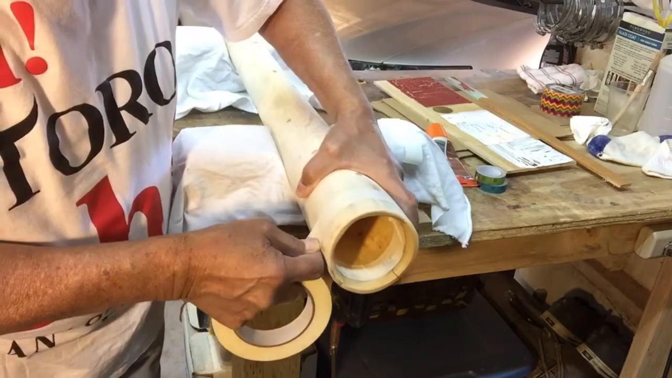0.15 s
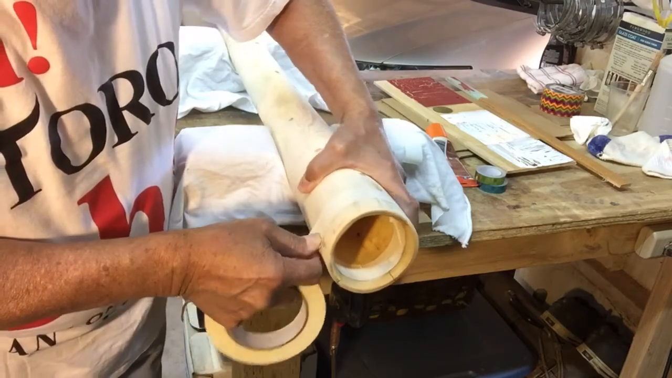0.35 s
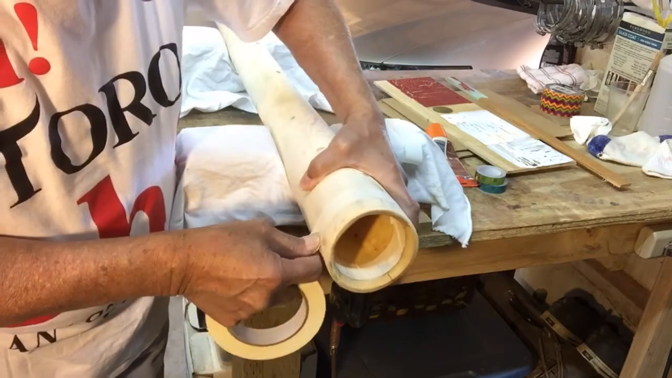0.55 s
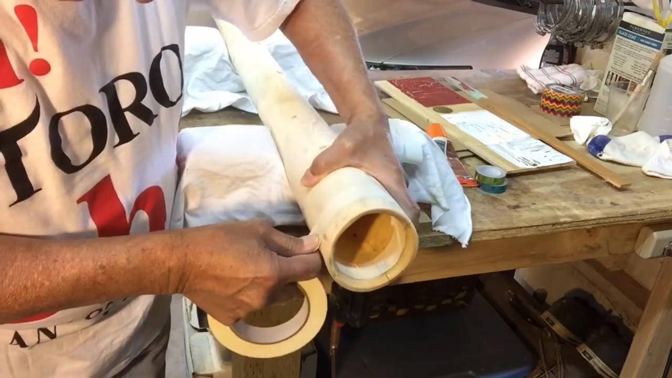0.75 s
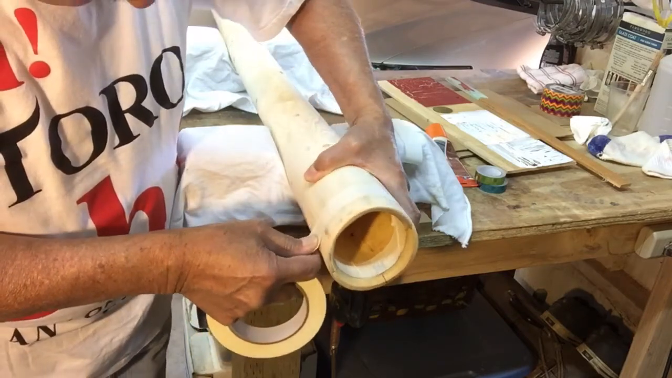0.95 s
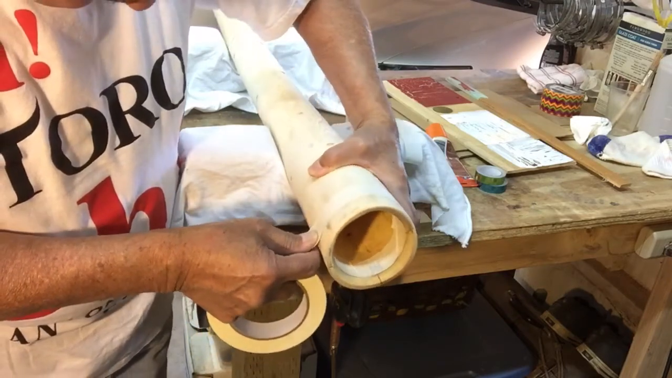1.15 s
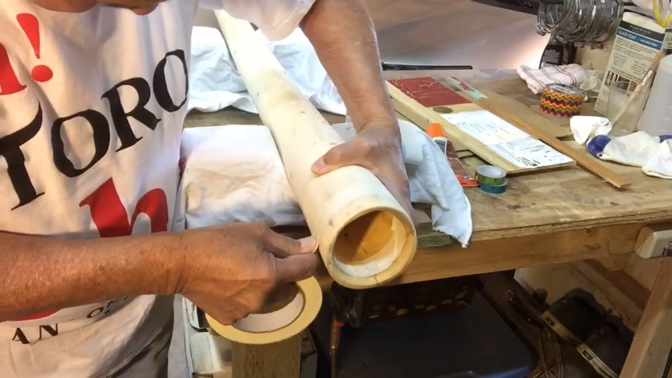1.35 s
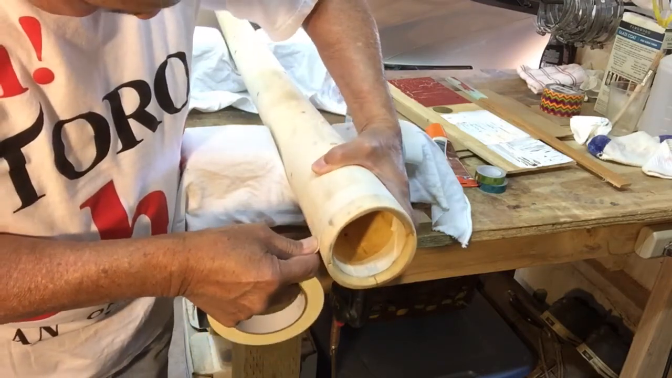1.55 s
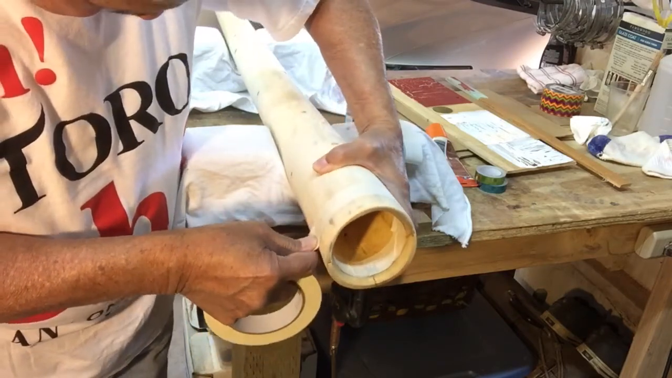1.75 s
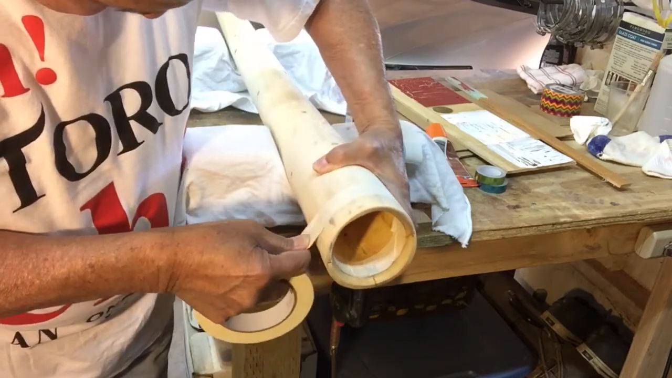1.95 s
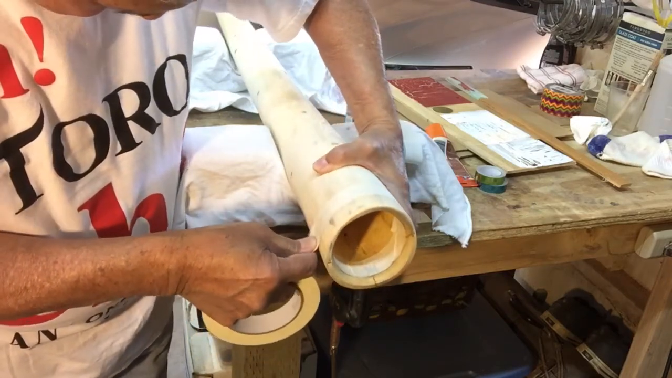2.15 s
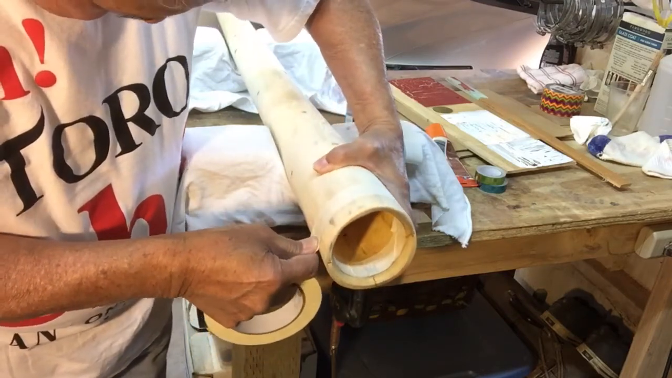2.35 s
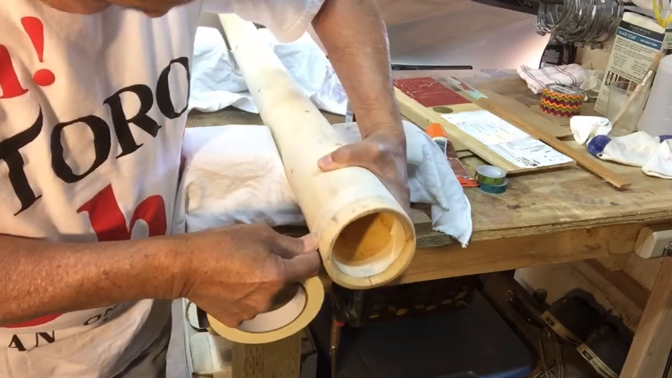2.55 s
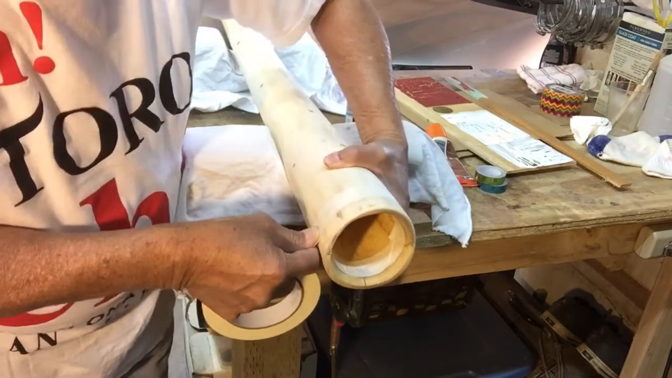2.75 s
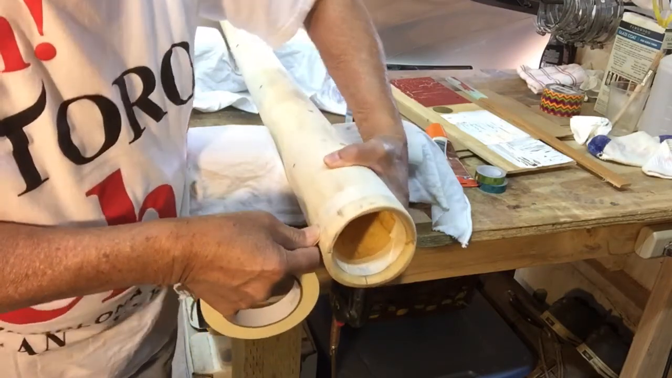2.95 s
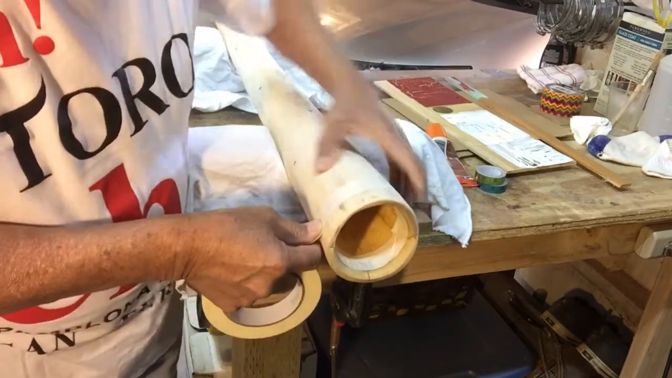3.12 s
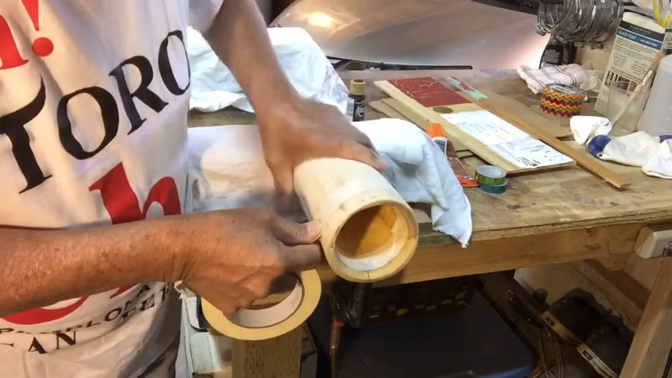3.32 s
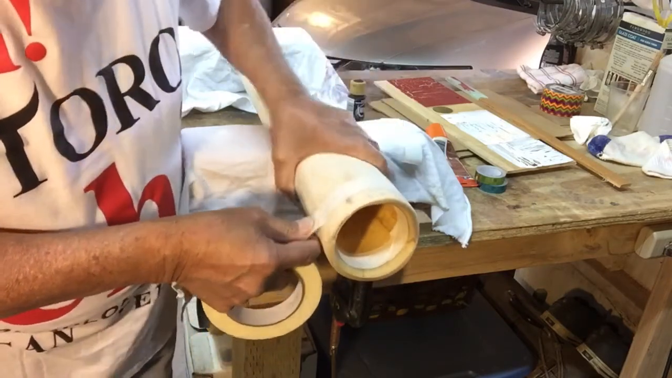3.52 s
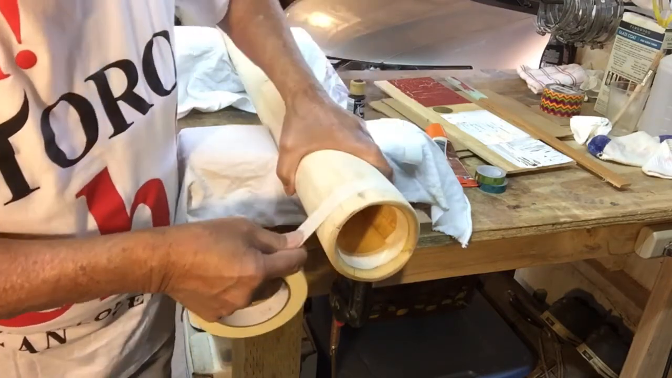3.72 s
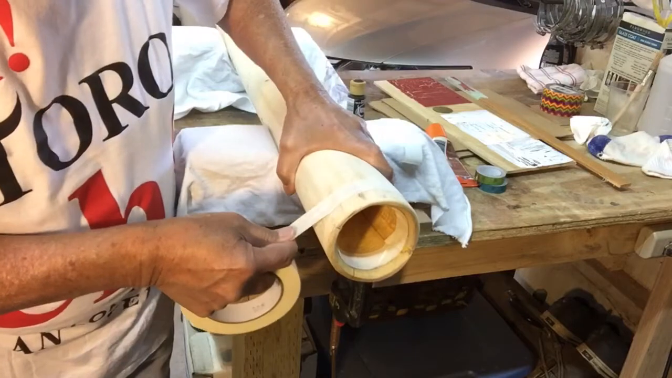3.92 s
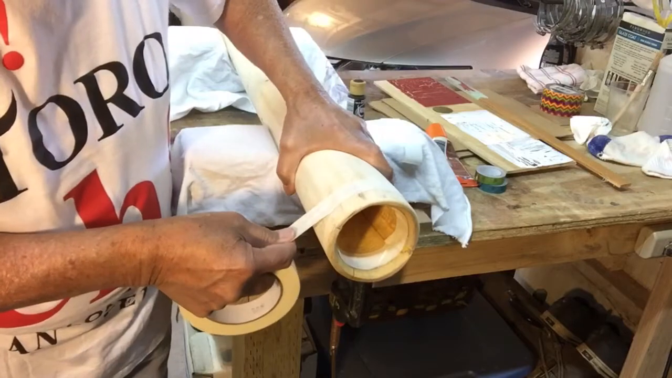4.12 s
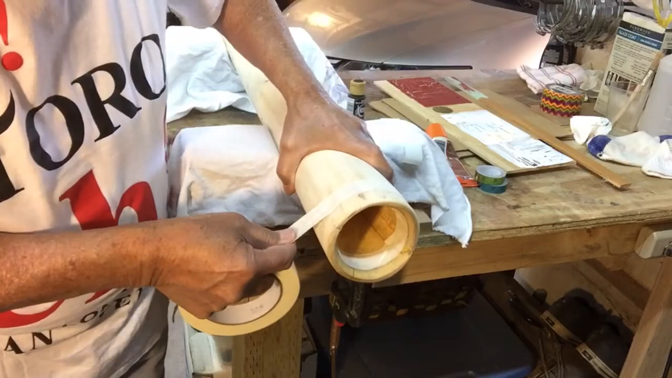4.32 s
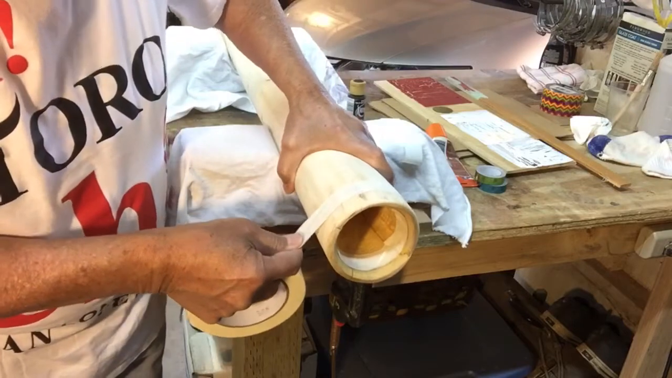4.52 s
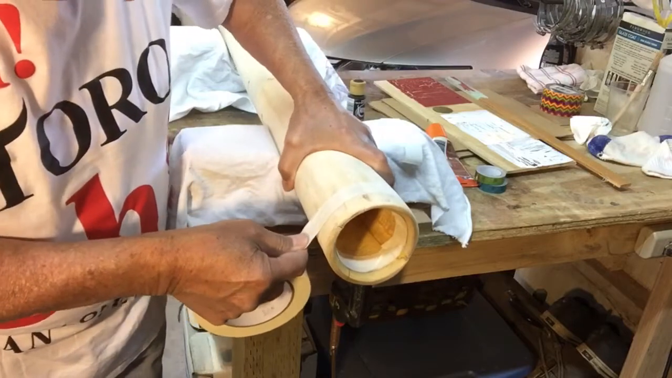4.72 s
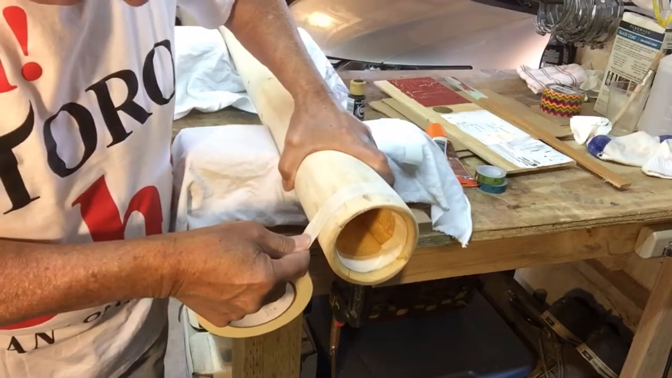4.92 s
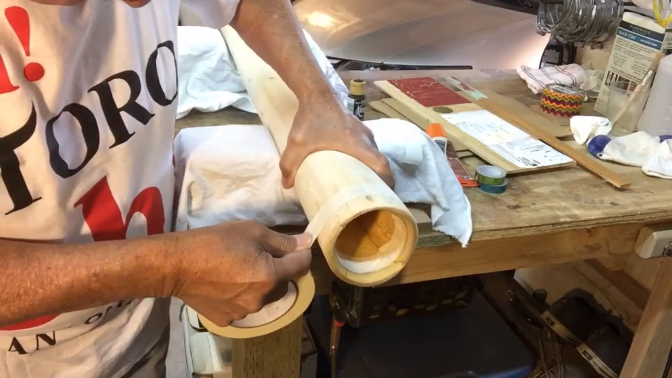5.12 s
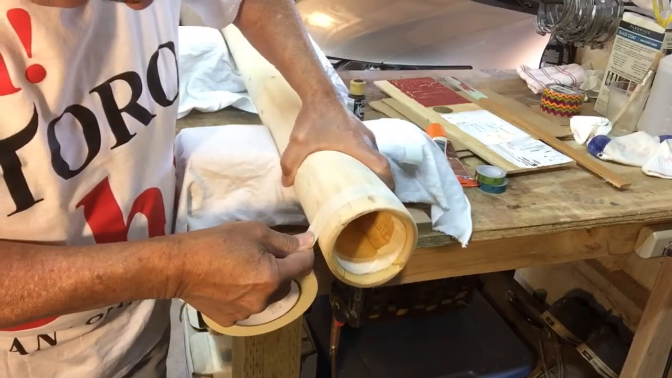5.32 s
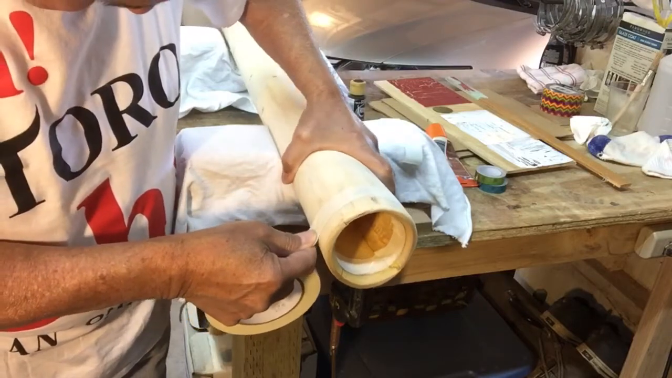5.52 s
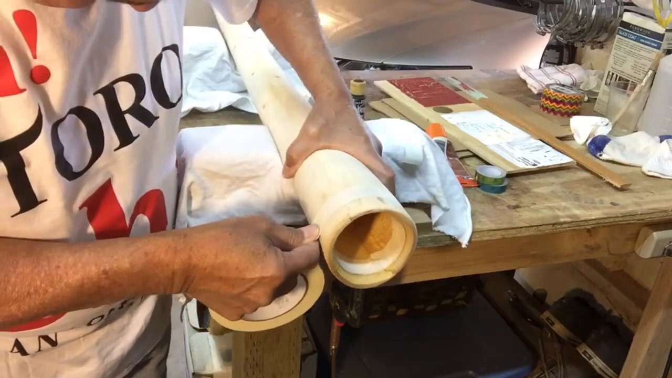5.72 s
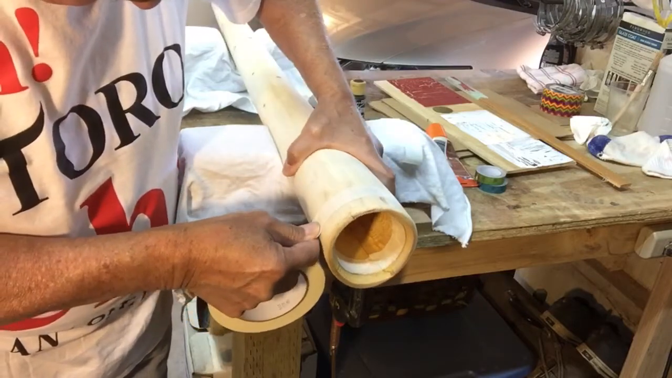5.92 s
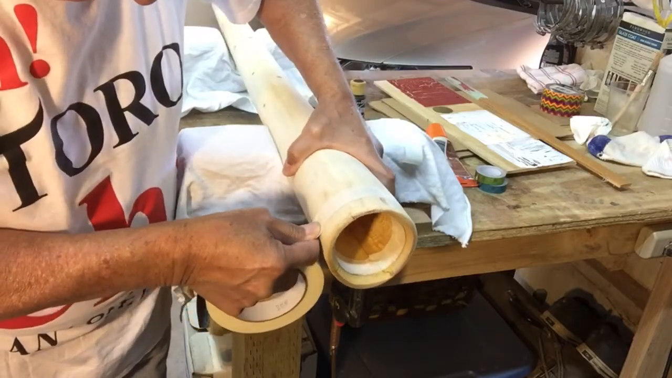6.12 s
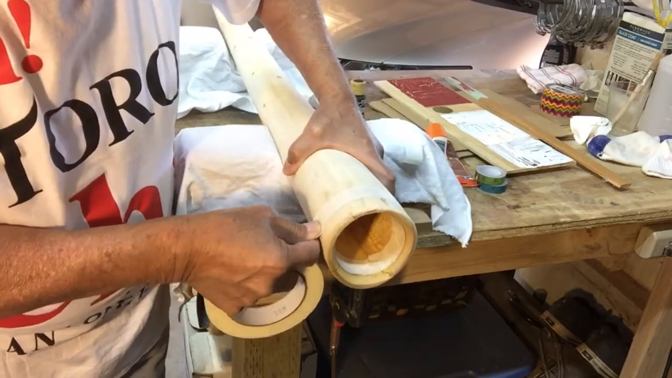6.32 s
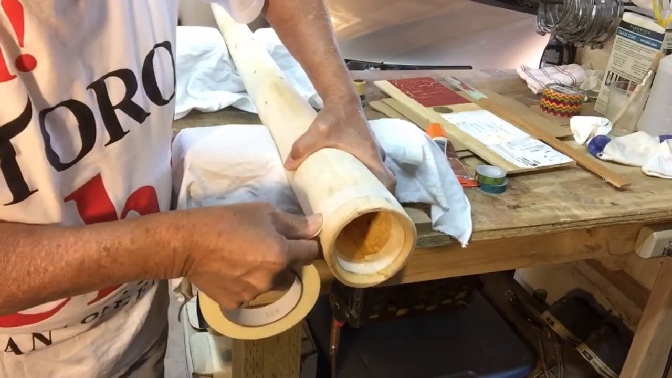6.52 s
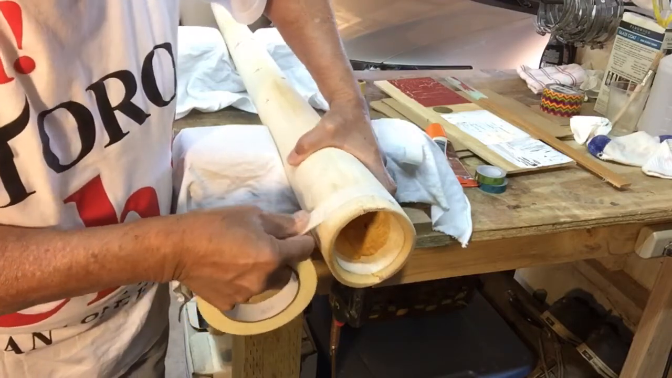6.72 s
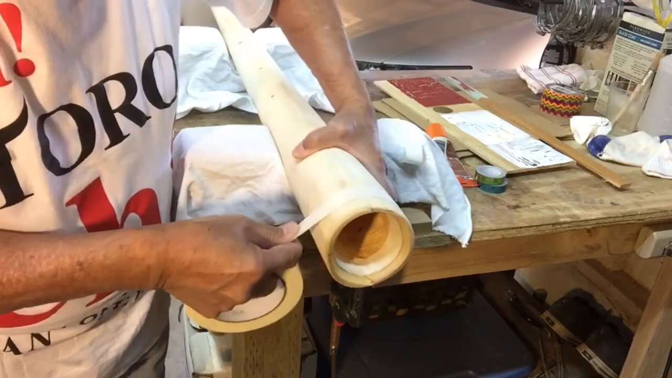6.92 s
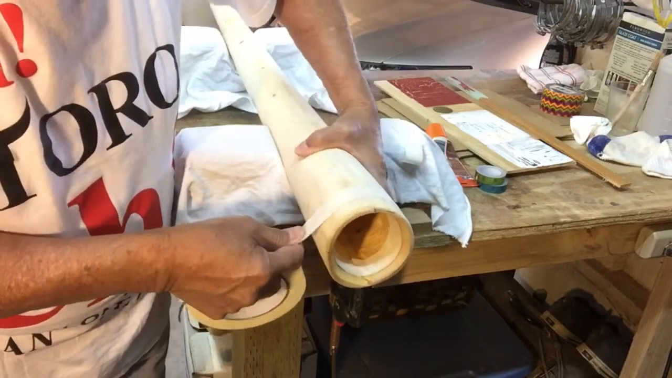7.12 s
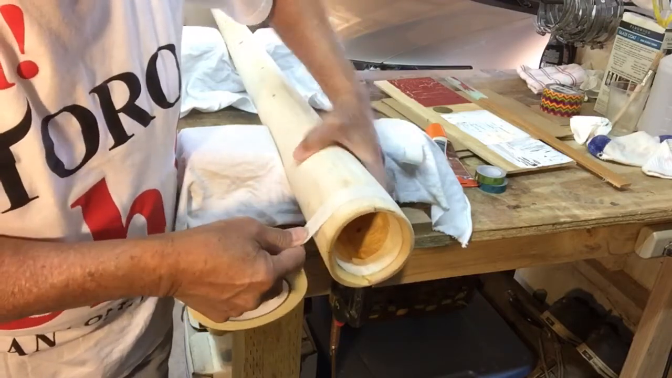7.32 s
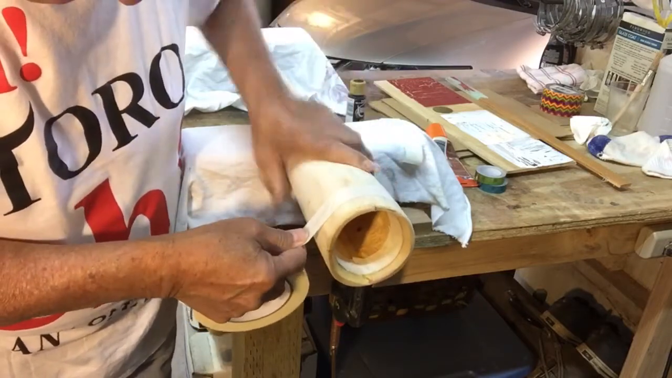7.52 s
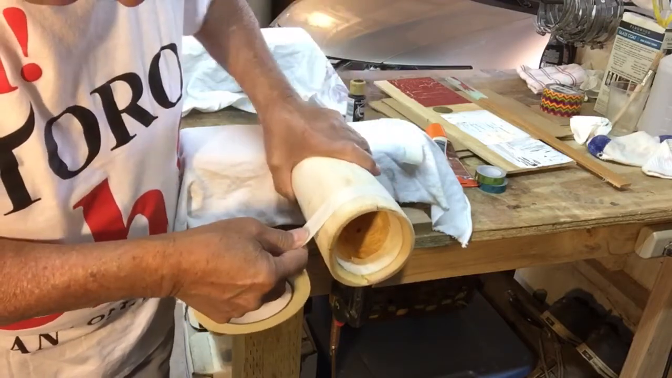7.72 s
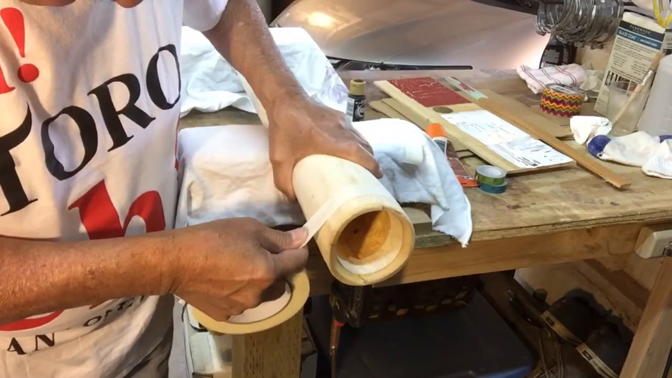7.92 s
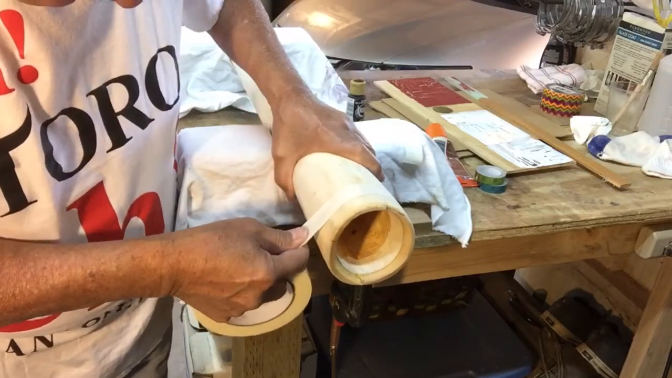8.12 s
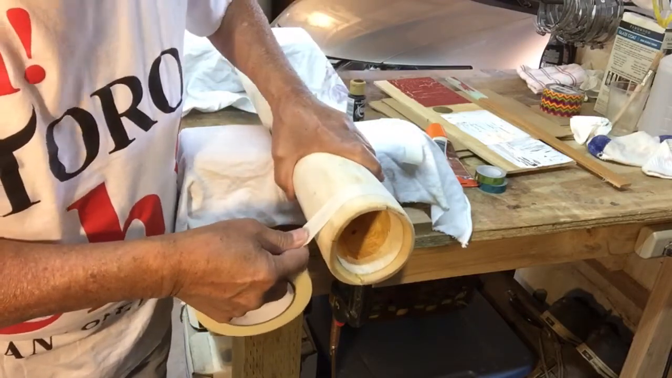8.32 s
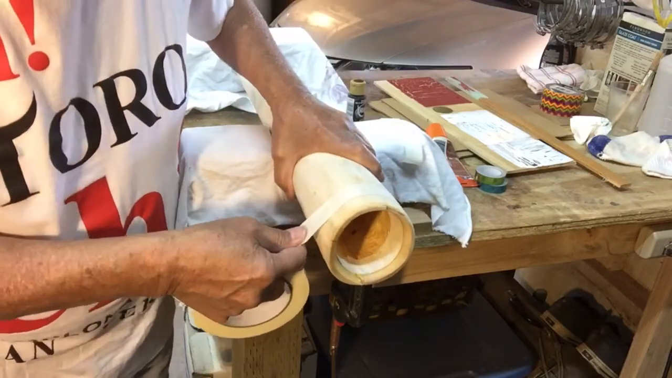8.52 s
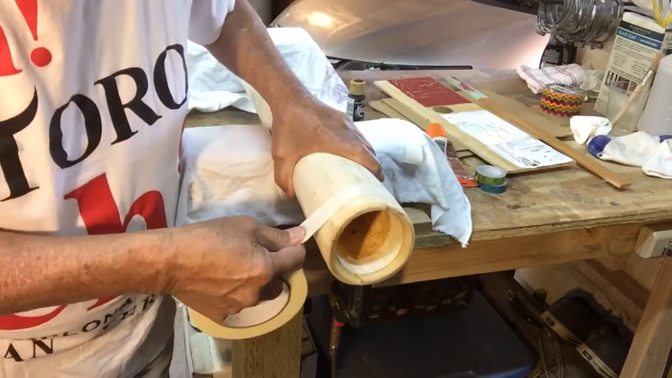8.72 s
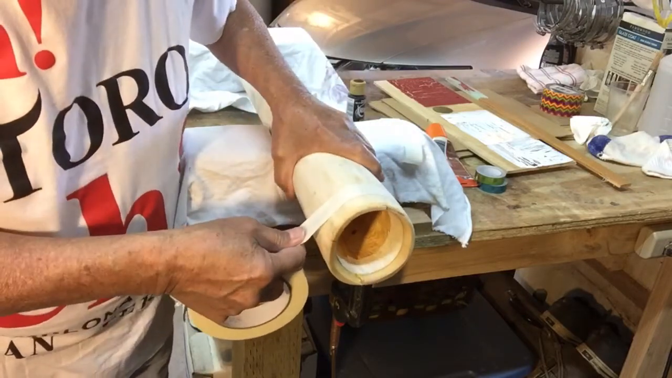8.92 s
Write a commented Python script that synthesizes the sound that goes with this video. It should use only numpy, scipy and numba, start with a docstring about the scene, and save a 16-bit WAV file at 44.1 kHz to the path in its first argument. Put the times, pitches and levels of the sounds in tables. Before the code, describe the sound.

Close, dry ripping crackles of paper tape come in uneven pulls, with soft hollow pipe thuds between them and a faint room rumble.

```python
"""In a small workshop, masking tape is wound round a plastic pipe, close to the microphone.
The glue lets go in short crackling pulls with sharp snaps: bursts of noise that ring the paper,
the free strip and, when it is taut, the roll. In and between the pulls the pipe knocks dully on
the padded bench: filtered thuds with the pipe's ring. A short echo and a quiet room noise
surround it all."""
import sys
import numpy as np
from scipy import signal
from scipy.fft import rfft, irfft, next_fast_len
from scipy.io import wavfile
from scipy.ndimage import uniform_filter1d
from numba import njit

SR = 44100
rng = np.random.default_rng(int(sys.argv[2]) if len(sys.argv) > 2 else 0)


def waveform_to_disk(signal):
    """Save audio, clipped to [-1, 1], as 16-bit WAV at the path in sys.argv[1]."""
    frames = np.transpose(np.atleast_2d(signal))
    scaled = np.clip(frames, -1, 1) * 32767
    samples = np.round(scaled).astype(np.int16)
    wavfile.write(sys.argv[1], SR, samples)


N = 399546  # length in samples


def undb(db):
    """Turn decibels into gain."""
    return 10 ** (np.asarray(db) / 20)


def along(rows, hz, axis=1):
    """Read one column of a table at any pitch, joining its points on a log-frequency axis."""
    rows = np.array(rows)
    return np.interp(np.log(hz + 1), np.log(rows[:, 0]), rows[:, axis])


def unit(x):
    """Scale a response to unit energy."""
    return x / np.sqrt(np.sum(x ** 2))


def through(x, response):
    """Play x through an impulse response."""
    return signal.fftconvolve(x, response)[:N]


def colour(points, size=2048):
    """Make an impulse response with the given spectrum that starts at once (minimum phase)."""
    hz = np.linspace(0, SR / 2, size // 2 + 1)
    cepstrum = irfft(np.log(undb(along(points, hz))))
    # folding the cepstrum forward leaves no sound before the blow
    cepstrum[1:size // 2] *= 2
    cepstrum[size // 2 + 1:] = 0
    return unit(irfft(np.exp(rfft(cepstrum))))


def fade(t60, seconds):
    """Exponential decay that falls by 60 dB in t60 seconds."""
    return np.exp(-np.log(1000) * np.arange(int(seconds * SR)) / SR / t60)


def add(track, s, sound):
    """Mix a sound in at time s."""
    i = max(int(s * SR), 0)
    track[i:i + len(sound)] += sound[:N - i]


def ringing(modes):
    """A struck object answers with a set of fading tones, its modes."""
    t = np.arange(SR // 2) / SR
    total = 0
    for hz, db, t60 in modes:
        tone = np.sin(2 * np.pi * hz * t + rng.uniform(0, 2 * np.pi))
        total = total + undb(db) * fade(t60, .5) * tone
    return unit(total)


@njit
def resonance(x, hz, damping):
    """Band-pass whose centre moves, with gain 1 at the centre."""
    y, band, low = np.empty(len(x)), 0., 0.
    for i in range(len(x)):
        g = np.tan(np.pi * hz[i] / SR)
        v = (band + g * (x[i] - low)) / (1 + g * (g + damping))
        band, low, y[i] = 2 * v - band, low + 2 * g * v, damping * v
    return y


def air(level_db=-67.5):
    """Quiet steady rumble and hiss of the room, made by shaping the spectrum of noise."""
    # colour of the room noise: pitch_hz [Hz], relative level_db [dB]
    air_colour = [(15, -44), (25, -22.5), (48, 0.5), (123, -4), (335, -11.5), (607, -13.5), (796, -15),
                  (1290, -14), (1480, -18), (2350, -18.5), (4870, -23), (6050, -21.5), (6740, -24),
                  (16000, -33.5)]
    hz = np.linspace(0, SR / 2, N // 2 + 1)
    noise = irfft(rfft(rng.standard_normal(N)) * undb(along(air_colour, hz)), N)
    return noise / noise.std() * undb(level_db)


def workshop(x, gap_s=0.0037, build_s=0.002, echo_db=-1):
    """Direct sound, then the dense echo of bench and walls, each pitch band fading at its own rate."""
    # the echo: pitch_hz [Hz], t60_s [s to fall by 60 dB], level_db [dB, before echo_db]
    echo_bands = [(100, 0.4, 5), (400, 0.29, -1), (1000, 0.27, -6), (2480, 0.15, -6.5), (6000, 0.24, -12),
                  (14000, 0.25, -18.5)]
    t = np.arange(SR // 2) / SR
    noise = rfft(rng.standard_normal(len(t)))
    hz = np.arange(len(t) // 2 + 1) * SR / len(t)
    centres = np.geomspace(60, 16000, 9)
    build_up = np.clip((t - gap_s) / build_s, 0, 1)
    echo = 0
    # each row of the identity picks one band, which overlaps its neighbours
    for centre, pick in zip(centres, np.eye(len(centres))):
        band = irfft(noise * np.interp(hz, centres, pick), len(t))
        shape = unit(fade(along(echo_bands, centre), .5) * build_up)
        echo = echo + band * shape * undb(along(echo_bands, centre, axis=2) + echo_db)
    return x + through(x, echo)


def bend(x, lag_scale_s):
    """Bending waves travel along the pipe: low notes are slower and arrive later."""
    size = next_fast_len(N + SR // 4)
    hz = np.arange(size // 2 + 1) * SR / size
    lag_s = lag_scale_s * np.maximum(np.sqrt(1000 / (hz + 40)) - .75, 0)
    # summing the lags over frequency gives the phase that delays each pitch
    phase = 2 * np.pi * np.cumsum(lag_s) * SR / size
    return irfft(rfft(x, size) * np.exp(-1j * phase), size)[:N]


def knocks(t60=0.049, thud_db=33, ring_db=28):
    """The pipe knocks on the bench: a noisy thud and the pipe's ring, duller for a softer contact."""
    # blows: start_s [s], level_db [dB, relative], low_hz and bright_hz [Hz, edges of the band
    # that the contact lets through], pipe_db [dB, ring before ring_db]
    blows = [(0.214, -48, 201, 1200, -3.5), (0.467, -47, 150, 432, -8), (1.068, -48.5, 574, 1500, -13),
             (1.409, -47, 148, 600, -2.5), (1.639, -41, 89.5, 860, -6.5), (2.465, -50.5, 270, 1830, -3),
             (2.959, -44.5, 610, 2000, -19), (3.141, -43, 60, 196, -7.5), (3.959, -63.5, 250, 884, 2.5),
             (4.228, -53, 248, 977, -2.5), (4.356, -56.5, 277, 1200, -1.5), (4.475, -51, 280, 1100, -2.5),
             (4.99, -41, 120, 1330, -4), (5.283, -42.5, 120, 1210, 0.5), (6.083, -41.5, 636, 2450, -9),
             (6.348, -43, 130, 1210, 0.5), (7.4, -65, 301, 1200, 2), (8, -52, 298, 788, -8.5)]
    # modes of the pipe: pitch_hz [Hz, before the grip shifts it], level_db [dB, relative], t60_s [s]
    pipe_modes = [(89, -10, 0.61), (179, -5, 0.077), (270, -14.5, 0.24), (356, -1, 0.19), (382, -0.5, 0.11),
                  (435.3, -3.5, 0.21), (606.5, -15.5, 0.143), (720, -14, 0.062), (805, -18.5, 0.15),
                  (872, -2, 0.14), (957, -4, 0.092), (1115, -6.5, 0.13), (1275, -2, 0.2),
                  (1380, -8.5, 0.15), (1680, -14, 0.44)]
    # colour of the bench: pitch_hz [Hz], relative level_db [dB per Hz]
    bench_colour = [(40, -15), (100, -3), (250, -11.5), (400, -5), (900, -3.5), (1400, -5), (2500, -5.5),
                    (6000, 1.5), (16000, -24)]
    out, bench, decay = np.zeros(N), colour(bench_colour), fade(t60, .5)
    for s, db, low_hz, bright_hz, pipe_db in blows:
        noise = rng.standard_normal(len(decay)) * decay
        thud = unit(signal.fftconvolve(noise, bench)[:len(decay)])
        # the gripping hand shifts all modes together a little from blow to blow
        grip = [1 + 0.017 * rng.standard_normal(), 1, 1]
        ring = ringing(np.array(pipe_modes) * grip)
        blow = undb(thud_db) * thud + undb(ring_db + pipe_db) * ring
        contact = signal.butter(2, [low_hz, bright_hz], "bandpass", fs=SR, output="sos")
        add(out, s, undb(db) * signal.sosfilt(contact, blow))
    return bend(out, lag_scale_s=0.0074)


def hand(swell_db_per_doubling=9.5, release_db_per_s=750, slack_db=11.5):
    """Each pull swells, holds and lets go while the lengthening strip rings lower.

    Returns crackle level [dB], roll level [dB], strip pitch [Hz] and strip ring [dB].
    """
    # pulls: start_s, rise_s, hold_s [s], level_db [dB, crackle at full strain, relative],
    # roll_db [dB, share of the roll at full strain, relative], strip_hz [Hz, at the end of the rise],
    # fall [octaves per s], ring_db [dB, strip ring, relative]
    pull_rows = [(0, 0.0064, 0.1, -62, 1, 6000, 1, -20), (.312, .05, 0.041, -32.5, -5.5, 4990, 9.7, -11),
                 (0.618, 0.041, 0.0054, -46.5, -9.5, 2710, 2, -11.5),
                 (0.763, 0.052, 0.042, -51.5, -7.5, 3000, 2, -23),
                 (0.873, 0.086, 0.015, -38.5, -5, 4600, 2, -31),
                 (1.015, 0.13, .07, -49, -11.5, 4260, 1, -13), (1.212, 0.061, 0.083, -38, .5, 3630, 2, -27),
                 (1.797, 0.046, .03, -49.5, -21, 5800, 13, -15),
                 (1.864, 0.016, .04, -48, -16, 2720, 15, 1.5), (2.553, 0.064, 0.053, -51, -1.5, 6000, 1, 1),
                 (2.685, 0.036, 0.022, -50, -8, 5730, 2, 3),
                 (2.82, 0.033, 0.009, -61.5, -10, 5600, 1.7, -21),
                 (3.073, .14, .02, -58.5, -7, 3800, 2, -11), (3.495, 0.069, 0.024, -37, -7, 4100, 2, -13.5),
                 (3.587, 0.054, .13, -36, 1, 4500, 4.6, -12.5),
                 (6.2, 0.21, 0.068, -58, -10.5, 5800, .5, -3.5),
                 (6.484, 0.029, 0.082, -38, -5, 2430, 1.8, -8),
                 (6.701, 0.11, .085, -30.5, 1, 5630, 2, -8.5),
                 (6.886, 0.019, 0.017, -37.5, -3, 5200, 2, -21.5),
                 (6.959, 0.049, 0.022, -54.5, -18, 5200, 2, -22),
                 (7.275, 0.092, 0.057, -61, -13, 5100, 2, -18),
                 (7.534, .055, 0.018, -52.5, -17, 5000, 1.9, -12),
                 (7.636, 0.062, 0.14, -58.5, -3, 4200, 3.9, -3),
                 (7.796, 0.017, 0.017, -32, 3.5, 2830, 9.4, -4),
                 (8.049, 0.078, 0.021, -48, -17.5, 5000, 3, 3),
                 (8.538, 0.041, 0.014, -50, -16, 4760, 2.2, 15)]
    t, pulls = np.arange(N) / SR, np.array(pull_rows)
    current = np.maximum(np.searchsorted(pulls[:, 0], t, side="right") - 1, 0)
    start, rise, hold, db, roll_db, hz, fall, ring_db = pulls[current].T
    age = np.maximum(t - start, 1 / SR)
    strain = np.minimum(age / rise, 1)
    stopped = np.maximum(age - rise - hold, 0)  # seconds since the hand stopped
    peel_db = db + swell_db_per_doubling * np.log2(strain) - release_db_per_s * stopped
    strip_hz = hz * 2 ** (-fall * (age - stopped - rise))
    # a slack strip passes less on to the roll
    tension_db = roll_db - slack_db * (1 - strain)
    controls = [np.maximum(peel_db, -100), tension_db, strip_hz, ring_db]
    return uniform_filter1d(np.array(controls), size=128)


def settling(rate=9, spread_db=4, db=-49):
    """Faint ticks at random moments, about rate per second, as single threads of glue let go."""
    breaks = rng.random(N) < rate / SR
    return breaks * undb(db + spread_db * np.minimum(rng.exponential(size=N), 2))


def crackle(peel_db, rate=1200, spread_db=4.0, t60=0.003, hiss=0.56, db=-3.0):
    """Many small threads, about rate per second, break at random, a few much louder than the rest."""
    breaks = rng.random(N) < rate / SR
    energy = breaks * undb(spread_db * np.minimum(rng.exponential(size=N), 4)) ** 2
    # energy fades twice as fast in dB as amplitude
    energy = signal.lfilter(fade(t60 / 2, .006), 1, energy)
    # evened out, because the hand sets how much glue parts in each moment
    energy /= uniform_filter1d(energy, size=1000) + 0.082 * energy.mean()
    return np.sqrt(energy + hiss ** 2) * rng.standard_normal(N) * undb(peel_db + db)


def snaps(t60=0.012, lead=3, db=21.0, scatter_db=0.5, jitter=.25, gap_s=.0042, fade_db_per_s=201.5):
    """A slip is one snap or a run: each a sharp release, then a brief avalanche of glue threads."""
    # slips, where the glue gives way: start_s [s], level_db [dB, before db], length_s [s]; the faint row at
    # 6.084 s only adds a click to the pipe knock there
    slips = [(.358, -27, 0), (.367, -23.5, 0), (0.382, -32, .007), (0.4161, -25.5, 0), (0.4232, -31.5, 0),
             (0.6587, -40, 0), (0.8371, -43, 0), (.92, -41, 0), (0.9402, -34, 0), (0.9525, -27.5, 0),
             (0.9835, -37.5, 0), (1.105, -44, 0), (1.152, -42.5, .007), (1.2424, -43, 0), (1.274, -32.5, 0),
             (1.28, -29.5, 0.00054), (1.302, -28.5, .009), (1.3412, -24, 0), (1.889, -38.5, 0),
             (1.9064, -29.5, 0), (1.951, -52, 0), (2.608, -51, 0), (2.7208, -44.5, 0), (3.1484, -46, 0),
             (3.555, -31, .009), (3.6246, -32, 0), (3.6546, -27, .007), (3.6857, -22, 0.0093),
             (3.7188, -27.5, .017), (3.7693, -30.5, 0), (6.084, -53, 0), (6.4801, -25.5, 0),
             (6.739, -32, 0), (6.7659, -23, 0), (6.7714, -23, 0), (6.793, -19.5, .013),
             (6.8262, -18.5, 0.0092), (6.8627, -26.5, 0), (6.867, -20, 0.012), (7.0076, -42.5, 0),
             (7.8096, -24, .007), (7.832, -26, 0), (8.137, -43.5, 0), (8.594, -43.5, 0)]
    force, decay = np.zeros(N), fade(t60, .015)
    for s, slip_db, length in slips:
        gaps = gap_s * np.exp(jitter * rng.standard_normal(size=8))
        delays = np.cumsum(gaps) - gaps
        bursts = rng.standard_normal((len(gaps), len(decay))) * decay
        bursts[:, 0] = lead  # the sharp release
        chances = rng.standard_normal(len(gaps))
        for late, burst, luck in zip(delays, bursts, chances):
            if late <= max(length, 0):
                # each snap relieves the strain for the next
                weaker_db = fade_db_per_s * late + scatter_db * luck * (late > 0)
                add(force, s + late, unit(burst) * undb(slip_db + db - weaker_db))
    return force


def tape(damping=0.57, strip_db=1, backing_db=-6, roll_db=-11, core_db=-19, strip_lag_s=.0008):
    """The breaking glue sounds the paper, the free strip and, under tension, the roll."""
    # colours of paper and roll: pitch_hz [Hz], relative level_db [dB per Hz]
    paper_colour = [(200, -44.5), (700, -35), (1300, -11.5), (2000, -5), (3000, -4.5), (4200, 1),
                    (5600, 1.5), (7000, -2), (9000, -1.5), (10300, -6), (12000, -1.5), (16000, -7.5)]
    roll_colour = [(40, -27.5), (100, -6.5), (180, -12.5), (300, -9.5), (400, -4), (510, 1), (680, -4),
                   (870, 1), (1100, -3), (1300, 4.5), (1700, 0.5), (2600, -6), (5000, -5), (16000, -39.5)]
    # resonances of the paper backing, and modes of the roll and its core:
    # pitch_hz [Hz], level_db [dB, relative], t60_s [s]
    backing_modes = [(3863, -5.5, 0.028), (4360, -10, 0.034), (4480, -2.5, 0.038), (5380, 2, .025),
                     (5970, -5.5, .025), (6530, -4.5, .02), (6830, -3, 0.02), (8000, -3, 0.01),
                     (12050, 0, 0.018)]
    core_modes = [(192.6, -4.5, 0.21), (508.4, 3, 0.14), (858, -5, 0.65), (910, -2, 0.2),
                  (1046, -0.5, 0.14), (1186, -6, .15), (1304, 0, .13), (2280, 2, .06)]
    peel_db, tension_db, hz, ring_db = hand()
    force = snaps() + crackle(peel_db) + settling()
    ring = undb(ring_db + strip_db)
    # filtered twice: the strip radiates little outside its resonance
    strip = resonance(resonance(force, hz, damping), hz, damping)
    # a narrower band lets less through, so make up its level
    strip = strip * np.sqrt(2 * SR / (np.pi * damping * hz))
    # the strip answers just after the glue breaks
    late_strip = np.roll(strip, int(strip_lag_s * SR))
    backing = through(force, colour(paper_colour))
    backing = backing + undb(backing_db) * through(force, ringing(backing_modes))
    paper = (backing + ring * late_strip) / np.sqrt(1 + ring ** 2)
    tug = bend(force * undb(tension_db), lag_scale_s=0.003976)
    roll = undb(roll_db) * through(tug, colour(roll_colour))
    core = undb(core_db) * through(tug, ringing(core_modes))
    return paper + roll + core


def scene():
    """Tape and pipe echo in the workshop, over its quiet room noise."""
    return (workshop(tape() + knocks()) + air())[None]


def record(dry):
    """The recorder thins the deepest rumble below 36 Hz and cuts the top above 16 kHz."""
    thin = signal.sosfilt(signal.butter(2, 36, "highpass", fs=SR, output="sos"), dry)
    return signal.sosfilt(signal.ellip(10, .2, 70, 16000, fs=SR, output="sos"), thin)


dry = scene()
out = record(dry)
waveform_to_disk(out)
```